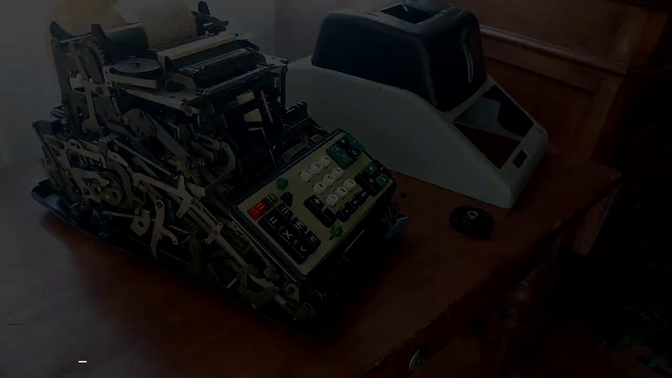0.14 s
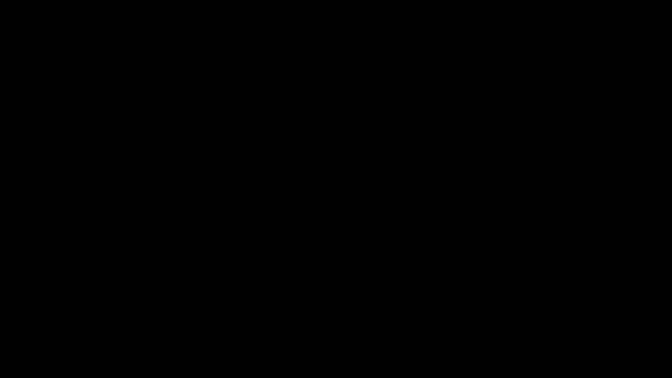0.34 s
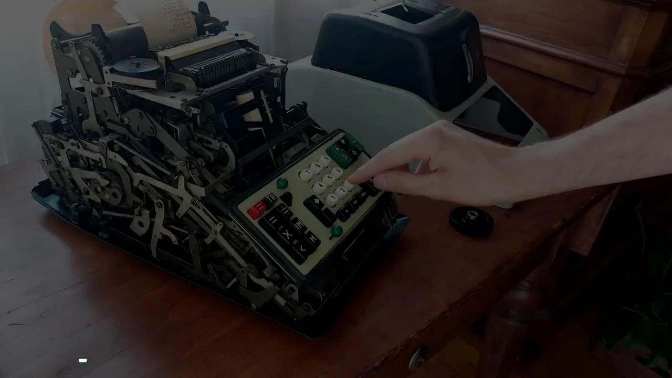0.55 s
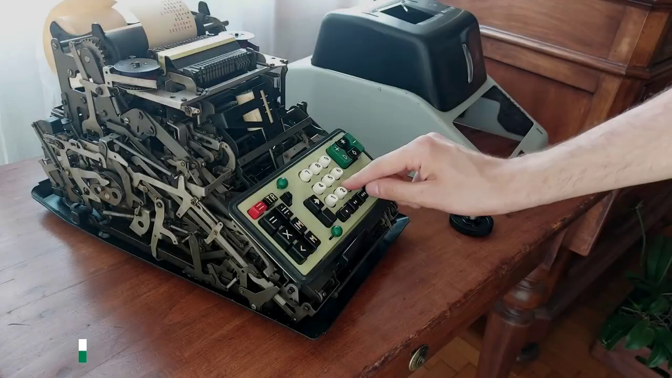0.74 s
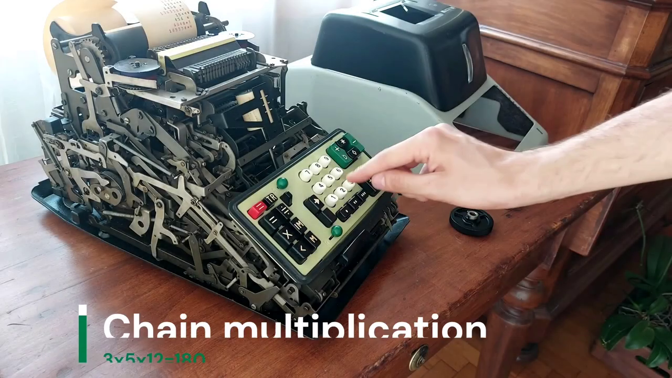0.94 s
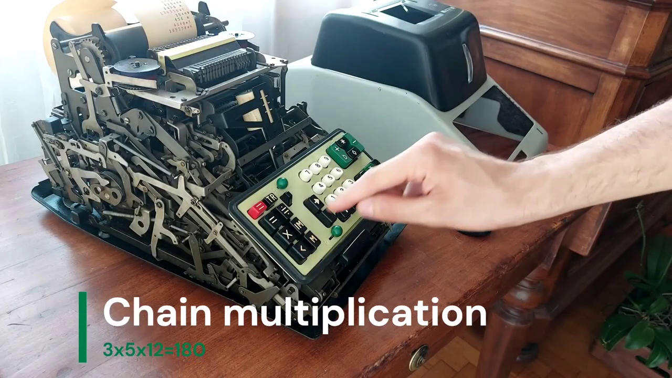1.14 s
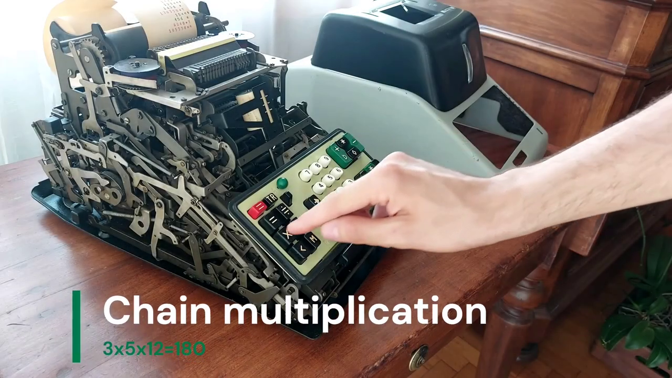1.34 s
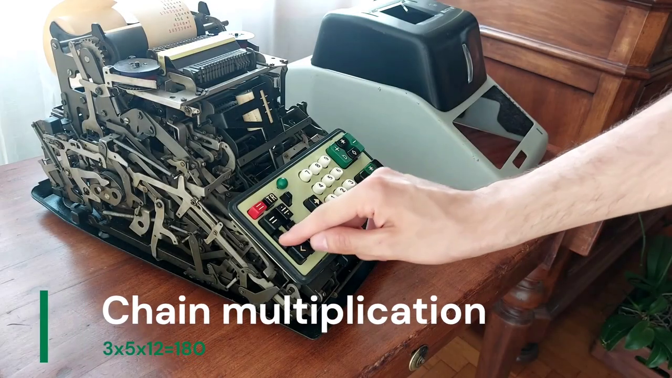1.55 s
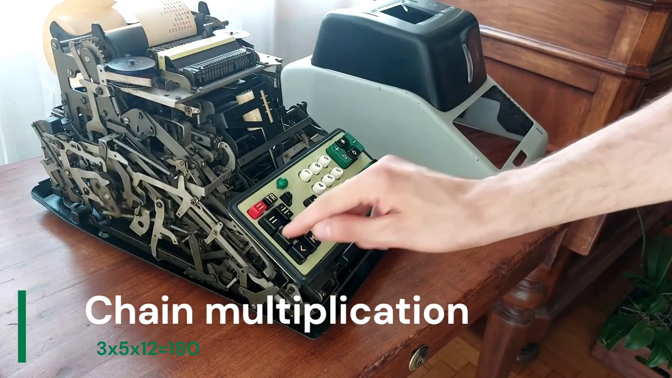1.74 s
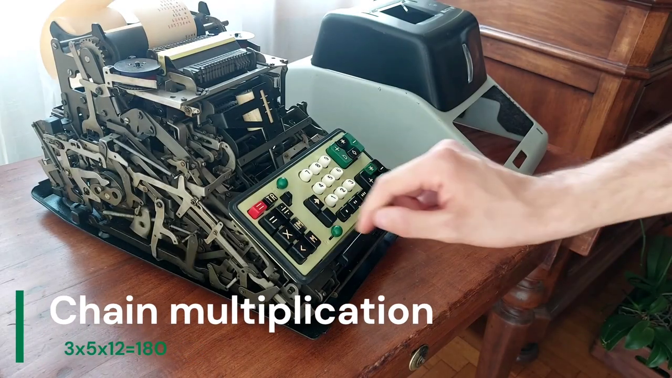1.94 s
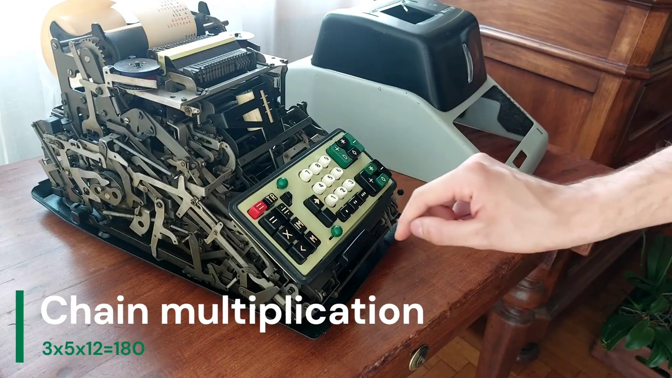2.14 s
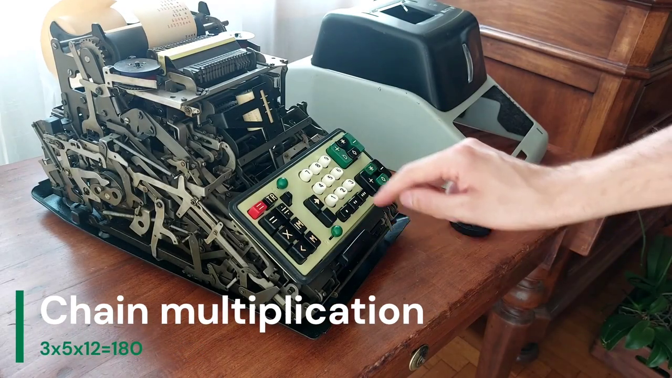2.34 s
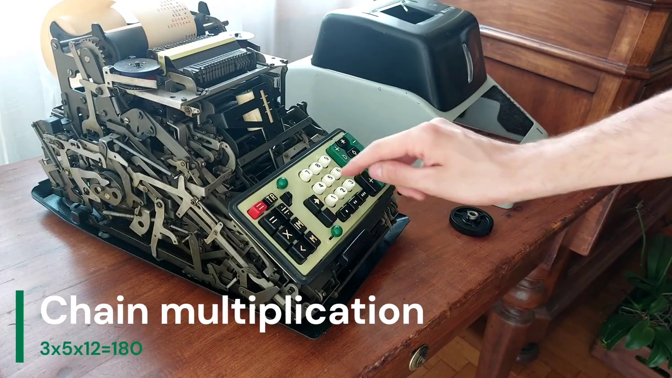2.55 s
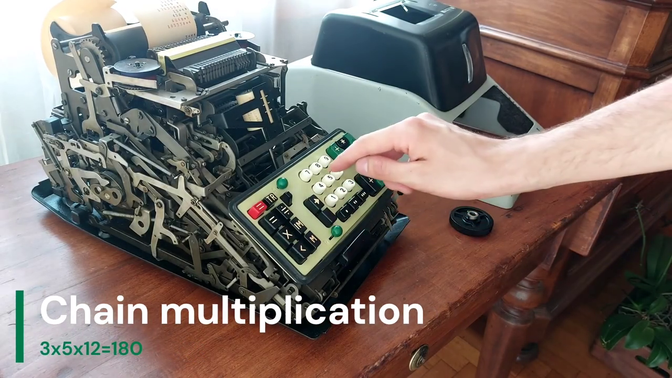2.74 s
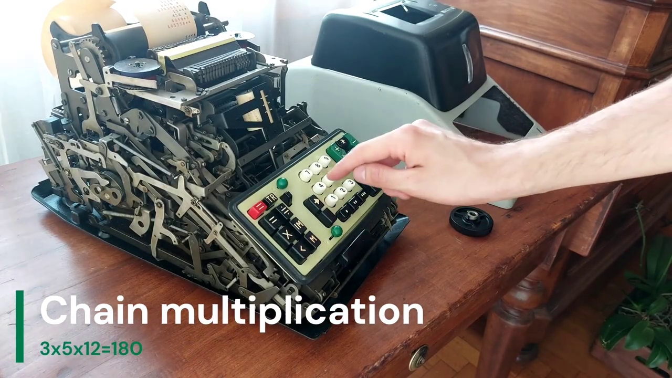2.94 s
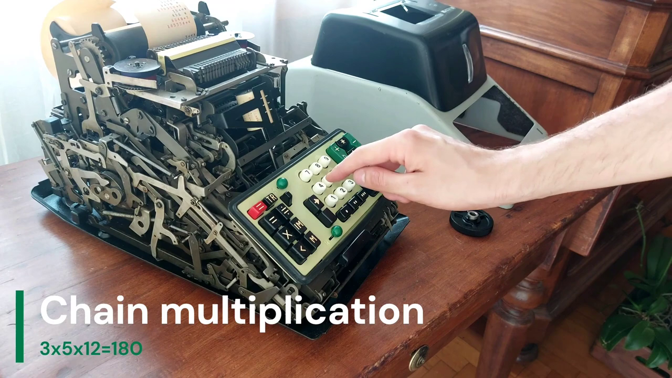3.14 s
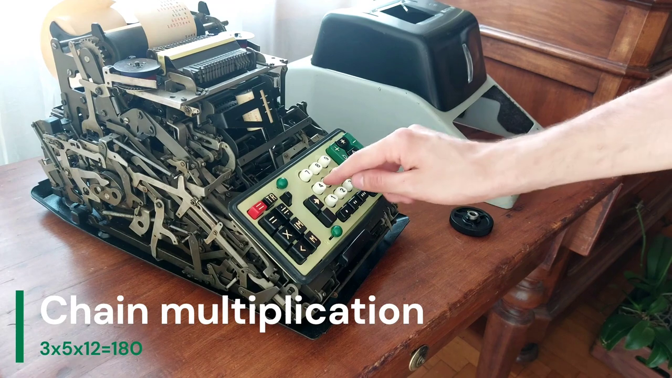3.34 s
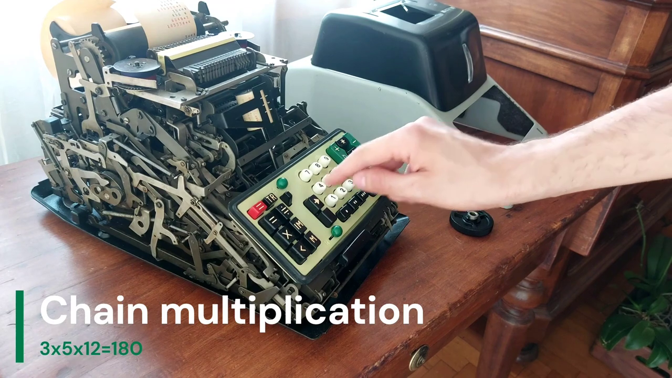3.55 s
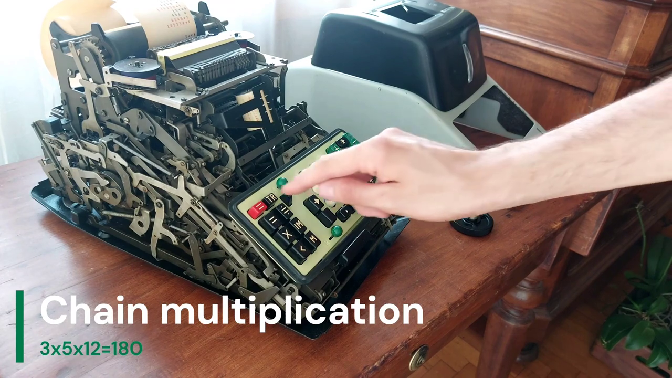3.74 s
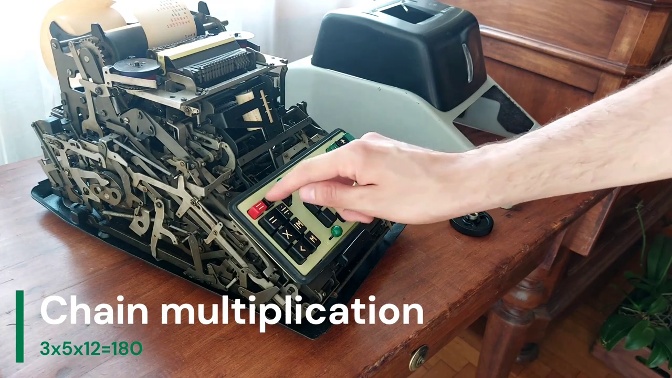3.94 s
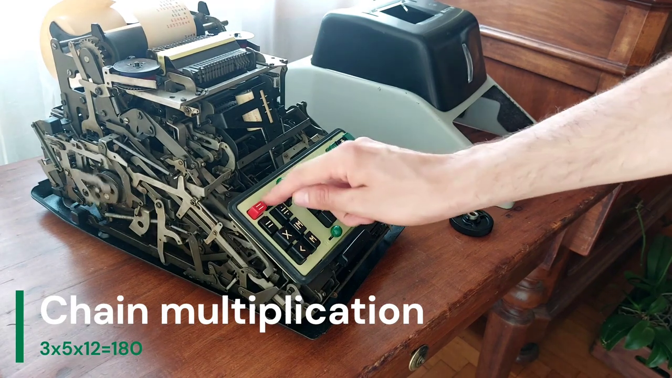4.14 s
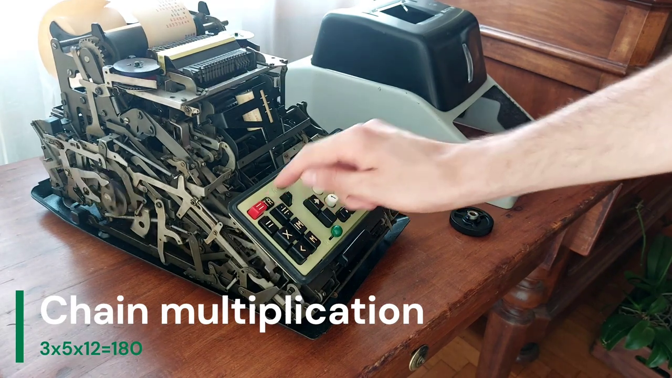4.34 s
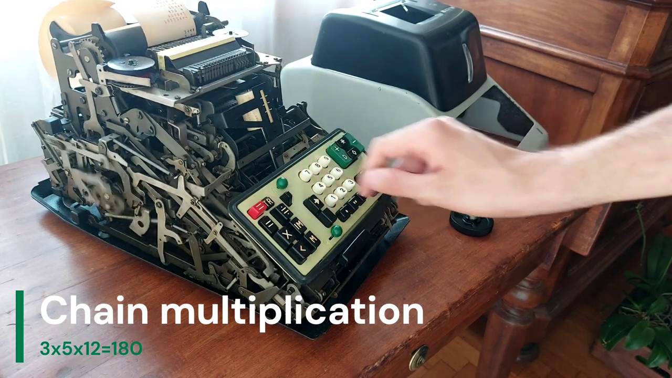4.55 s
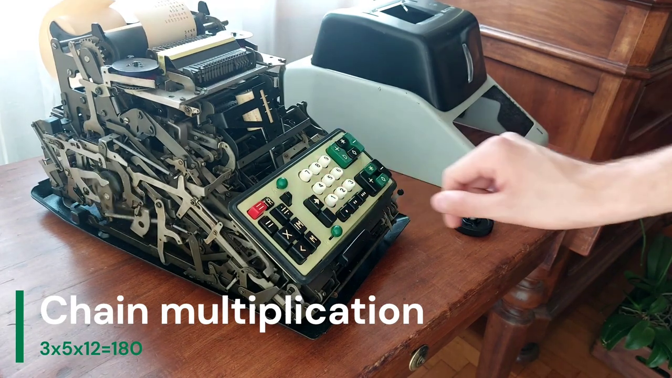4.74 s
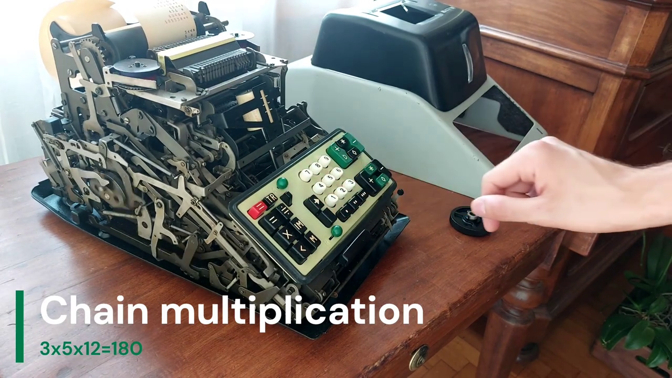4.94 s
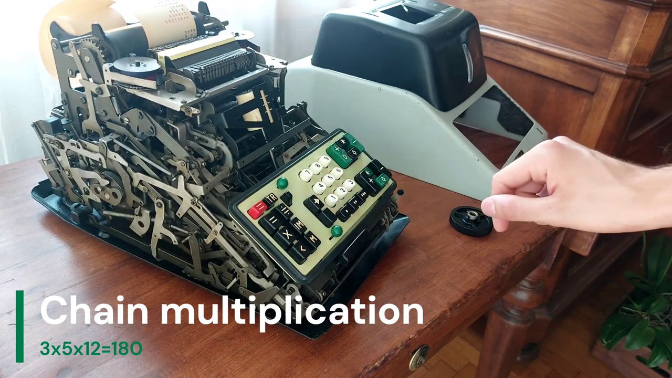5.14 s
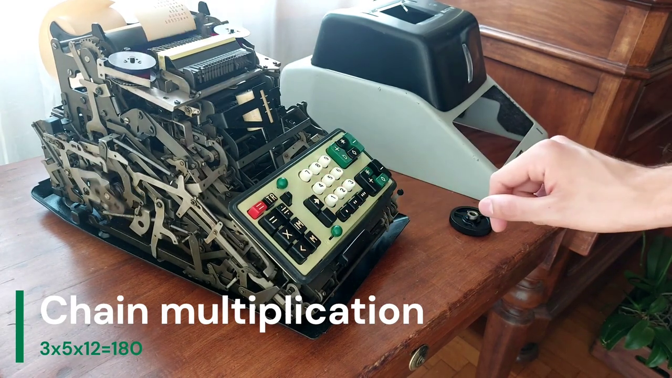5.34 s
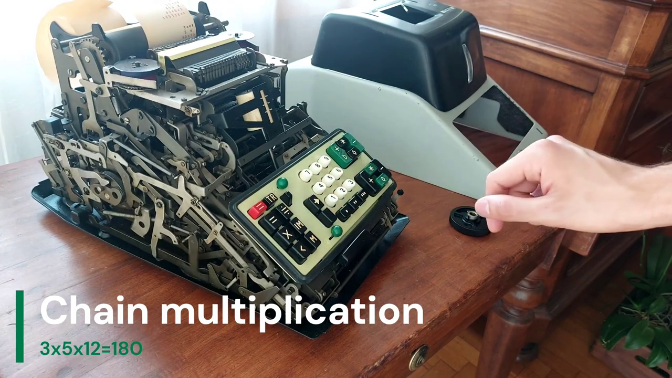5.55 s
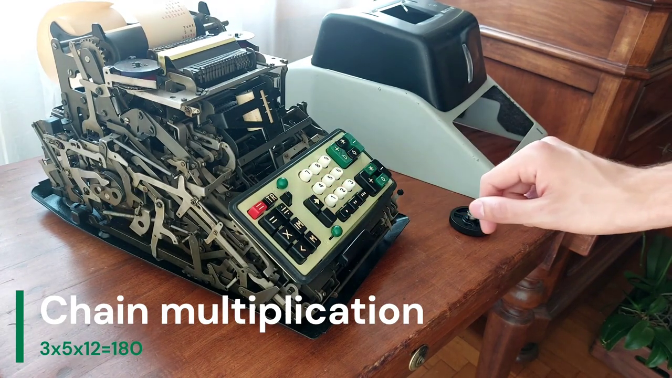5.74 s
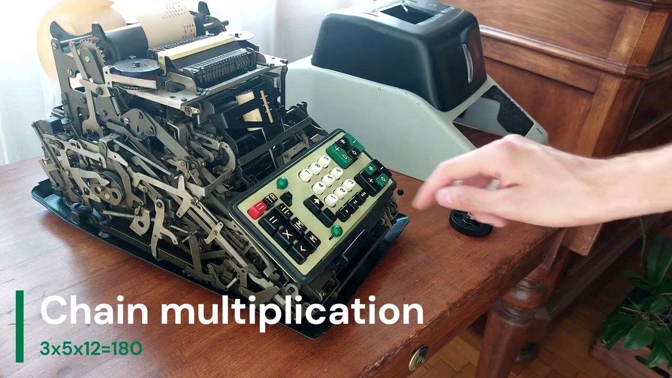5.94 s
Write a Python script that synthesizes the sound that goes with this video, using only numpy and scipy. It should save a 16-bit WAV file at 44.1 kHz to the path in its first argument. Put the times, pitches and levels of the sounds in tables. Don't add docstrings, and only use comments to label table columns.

```python
import sys
import numpy as np
from scipy import signal
from scipy.fft import rfft, irfft, next_fast_len
from scipy.io import wavfile
from scipy.ndimage import uniform_filter1d

SR = 44100
rng = np.random.default_rng(int(sys.argv[2]) if len(sys.argv) > 2 else 0)


def put_to_file(sound):
    columns = np.atleast_2d(sound).T
    safe = np.clip(columns, -1, 1)
    whole_steps = np.round(safe * 32767)
    wavfile.write(sys.argv[1], SR, whole_steps.astype(np.int16))


def convert_level_to_amplitude(level_db):
    exponent = np.asarray(level_db, float) / 20
    return 10 ** exponent


N = 263718
TIME = np.arange(N) / SR

# start_s, moving_parts_db, motor_effort_db
CYCLES = [
    [(1.61, -56, -62), (1.65, -50, -48), (1.706, -39, -35.5), (1.794, -27, -35), (1.906, -29.5, -35.5),
     (2.002, -26.5, -39.5), (2.076, -47.5, -49.5), (2.172, -49.5, -60.5), (2.2, -54, -60)],
    [(4.125, -50, -57), (4.161, -50, -42), (4.227, -38, -43), (4.301, -31.5, -34.5), (4.445, -26, -34.5),
     (4.595, -33, -37), (4.759, -29.5, -36.5), (4.893, -37.5, -40), (4.973, -20.5, -34)],
    [(4.973, -26.5, -34.5), (5.05, -28, -37), (5.163, -42, -48), (5.285, -47.5, -50.5),
     (5.365, -32.5, -37.5), (5.513, -27, -37.5), (5.611, -30, -36.5), (5.695, -49, -50.5), (5.8, -55, -56)],
]
# frequency_hz, level_db (per Hz)
STEEL = [(710, -12), (1200, -14), (1870, -7.5), (2290, -6), (3710, -2.5), (4970, -2), (8320, -3),
         (12100, -0.5), (15000, -0.5), (15700, 3)]
# frequency_hz, level_db (per Hz)
FRAME = [(240, -36.5), (400, -2.5), (439, -8), (526, -13), (772, -0.5), (896, -1.5), (1070, -1), (1870, -6),
         (2600, -1.5), (3380, -45), (5720, -120)]


def evened(x):
    return x / np.sqrt(np.mean(x ** 2) + 1e-20)


def leaned(x, lean_db):
    return x * convert_level_to_amplitude(np.array([[0.5], [-0.5]]) * lean_db)


def read(points, hz):
    f, value = np.transpose(points)
    return np.interp(np.log(hz + 1), np.log(f + 1), value)


def envelope(tables, column):
    gain = np.zeros(N)
    for rows in tables:
        rows = np.array(rows)
        level_db = np.interp(TIME, rows[:, 0], rows[:, column], -150, -150)
        gain = np.maximum(gain, convert_level_to_amplitude(level_db))
    return uniform_filter1d(gain, size=180)


def resonances(x, modes):
    out = 0
    for hz, width_hz, db in modes:
        b, a = signal.iirpeak(hz, hz / width_hz, SR)
        out = out + convert_level_to_amplitude(db) * signal.lfilter(b, a, x)
    return out


def coloured(x, points):
    size = next_fast_len(x.shape[-1])
    gain = convert_level_to_amplitude(read(points, np.fft.rfftfreq(size, 1 / SR)))
    return irfft(rfft(x, size) * gain, size)[..., :x.shape[-1]]


def stereo_noise(points, lean_db, patchy_db):
    # frequency_hz, likeness (0 to 1)
    likeness = [(60, 1), (300, 0.47), (800, 0.77), (2000, .15), (6000, 0.019)]
    frames, hz = N // 256 + 5, np.fft.rfftfreq(1024, 1 / SR)
    a, b, c, d, patches = rng.standard_normal((frames, 513, 5)).T
    patches = uniform_filter1d(patches, size=10, axis=0)
    patches = evened(uniform_filter1d(patches, size=10, axis=1))
    like = np.clip(read(likeness, hz), -1, 1)[:, None]
    left = a + 1j * b
    right = like * left + np.sqrt(1 - like ** 2) * (c + 1j * d)
    spectra = np.array([left, right]) * convert_level_to_amplitude(read(points, hz)[:, None] + patchy_db * patches)
    noise = signal.istft(spectra, nperseg=1024, noverlap=768)[1][:, :N]
    return leaned(evened(noise), lean_db)


def room_tone():
    # frequency_hz, level_db (per Hz)
    air_colour = [(18, -80), (30, -24.5), (53, -4.5), (87, -14), (125, -22), (158, -19.5), (259, -21.5),
                  (298, -24), (378, -24), (417, -33.5), (1260, -37), (1370, -37), (2680, -18.5),
                  (3400, -51), (4420, -75.5), (7480, -120)]
    # pitch_hz, width_hz, level_db
    appliances = [(125.7, 7.4, -69.5), (881, 24, -81), (2470, 30, -75.5)]
    hums = 0
    for hz, width_hz, db in appliances:
        source = rng.standard_normal(N) + 2.8 * rng.standard_normal((2, N))
        hums = hums + convert_level_to_amplitude(db) * evened(resonances(source, [(hz, width_hz, 0)]))
    self_noise = convert_level_to_amplitude(-83.0) * rng.standard_normal((2, N))
    air = convert_level_to_amplitude(-61.0) * stereo_noise(air_colour, lean_db=4.5, patchy_db=2.5)
    return air + leaned(hums, lean_db=16.5) + self_noise


def room(x):
    # frequency_hz, t60_s
    decay = [(100, 1), (1000, 0.49), (4600, 0.36), (12000, 0.19)]
    out, size = np.zeros((2, N)), SR // 2
    slots = np.arange(220, size - 20, 20)
    for k in range(3):
        taps = np.zeros((2, size))
        at = slots + rng.integers(0, 20, (2, len(slots)))
        np.put_along_axis(taps, at, rng.choice([-1., 1.], at.shape), 1)
        hz, t, z = signal.stft(taps, SR, nperseg=128)
        fading = convert_level_to_amplitude(-60 * t / read(decay, hz)[:, None])
        tail = signal.istft(z * fading, SR, nperseg=128)[1]
        turn = np.sqrt(2 / 3) * np.cos(2 * np.pi * (7 * TIME + k / 3))
        out += signal.fftconvolve(x * turn, tail / np.linalg.norm(tail[0]), axes=1)[:, :N]
    return out


def coasting():
    # after_release_s, brush_hiss_db
    rundown = [(0, -52), (0.2, -49.5), (0.5, -53), (0.95, -56.5), (1.4, -54.5), (1.6, -57.5), (1.88, -63),
               (2.03, -71)]
    # load_drops_s, next_engagement_s
    releases = [
        (2.1, 4.13),
        (5.2, 7.8),
        (5.701, 6.5),
    ]
    after, db = np.transpose(rundown)
    spans = []
    for start, end in releases:
        span = [(start, db[0])]
        span += [(start + t, d) for t, d in rundown[1:] if start + t < end]
        span.append((end, np.interp(end - start, after, db)))
        spans.append(span)
    return envelope(spans, column=1)


def brushes(rotor):
    # frequency_hz, level_db (per Hz)
    brush_colour = [(740, -29), (1250, -5.5), (1850, -5.5), (2310, 1), (2600, -5.5), (4310, -6.5),
                    (6870, -5.5), (8320, -9), (11800, -7), (15700, -14.5)]
    return convert_level_to_amplitude(1.0) * stereo_noise(brush_colour, lean_db=4.0, patchy_db=0.8) * rotor


def gear_train(rotor, flutter):
    # pitch_hz, width_hz, level_db
    gear_modes = [(758, 105, 6.5), (954, 84, 10), (1060, 40, 11.5), (2170, 54, -7.5)]
    # peak_s, pitch_hz, level_db
    gear_rubs = [
        (2.28, 790, -60),
        (2.66, 794, -59),
        (3.17, 790, -59),
        (5.251, 1040, -49),
        (5.95, 2130, -48),
    ]
    teeth = rng.standard_normal((3, N))
    teeth = 1.33 * teeth[0] + teeth[1:]
    whirr_gain = convert_level_to_amplitude(2) * abs(rotor) ** 1.106
    whirr = evened(resonances(teeth, gear_modes)) * flutter * whirr_gain
    rubs = 0
    for s, hz, db in gear_rubs:
        swell = convert_level_to_amplitude(db) * np.exp(-((TIME - s) / 0.038) ** 2)
        rubs = rubs + swell * evened(resonances(teeth, [(hz, 220, 0)]))
    return leaned(convert_level_to_amplitude(-3.0) * whirr + rubs, lean_db=1.5)


def rotor_unbalance(flutter):
    # start_s, level_db
    loaded = [
        [(4.2, -47), (4.262, -78), (4.42, -47.5), (5.006, -43.5), (5.122, -62), (5.344, -61), (5.636, -61),
         (5.7, -68)],
    ]
    hum = convert_level_to_amplitude(6.5) * np.sin(2 * np.pi * 68 * TIME) * flutter * envelope(loaded, column=1)
    return leaned(hum, lean_db=0.5)


def motor():
    flutter = convert_level_to_amplitude(1.3 * evened(uniform_filter1d(rng.standard_normal(N), size=1500)))
    rotor = coasting()
    return brushes(rotor) + gear_train(rotor, flutter) + rotor_unbalance(flutter)


def desk_top(effort):
    # pitch_hz, width_hz, level_db
    desk_modes = [(68, 16.4, -2.5), (102.5, 18.5, -0.5), (123.5, 2.2, -6.5), (178, 42, -13.5),
                  (227.4, 25.7, -5.5), (282.7, 6.7, 0), (356.8, 6.8, -6), (422, 4.4, -4.5)]
    # start_s, level_db
    thuds = [
        (0.786, -59.5),
        (0.997, -47),
        (1.03, -76),
        (1.96, -33),
        (3.514, -50.5),
        (3.88, -58.5),
        (5.03, -33.5),
        (5.127, -41.5),
        (5.46, -55),
    ]
    shake = convert_level_to_amplitude(-3.5) * abs(effort)
    for s, db in thuds:
        shake = shake + convert_level_to_amplitude(db) * (TIME > s) * np.exp(-abs(TIME - s) / 0.053)
    unsteady = convert_level_to_amplitude(1.84 * evened(uniform_filter1d(rng.standard_normal(N), size=900)))
    jolts = rng.standard_normal((3, N)) * unsteady
    wood = evened(resonances(jolts[0] + 0.36 * jolts[1:], desk_modes))
    wood = wood * uniform_filter1d(shake, size=300)
    return signal.sosfilt(signal.butter(2, 48, "high", fs=SR, output="sos"), wood)


def frame_drone(effort):
    drone = stereo_noise(FRAME, lean_db=0.0, patchy_db=1)
    return convert_level_to_amplitude(-1.5) * drone * abs(effort) ** 1.023


def dwelling():
    # trip_s, hush_db
    dwells = [
        (1.7521, -1),
        (1.9533, -4),
        (4.6432, 2),
        (4.7447, -9),
        (4.9528, -2),
        (5.1244, -16),
        (5.563, -8),
    ]
    return convert_level_to_amplitude(sum(db * (TIME < s) * np.exp(-((TIME - s) / 0.026) ** 2) for s, db in dwells))


def rattle():
    # start_s, level_db
    stems = [
        [(0.688, -77), (0.778, -81)],
        [(1.488, -74), (1.615, -51.5)],
        [(4.112, -48), (4.143, -48)],
    ]
    ticks_per_s, spread_db, parts = 600, 4, 16
    size = convert_level_to_amplitude(spread_db * np.minimum(rng.exponential(1, N), 3))
    size = size * (rng.random(N) < ticks_per_s / SR)
    part, t, out = rng.integers(0, parts, N), np.arange(600) / SR, np.zeros((2, N))
    for k in range(parts):
        common, own = rng.standard_normal(600), rng.standard_normal((2, 600))
        tick = (0.5 * common + own) * np.exp(-t / rng.uniform(0.0009, 0.0035))
        ping = np.sin(2 * np.pi * (rng.uniform(2900, 14500) * t + rng.random((2, 1))))
        tick += 0.4 * ping * np.exp(-t / 0.003)
        out += signal.oaconvolve((size * (part == k))[None], tick, axes=1)[:, :N]
    ticking = leaned(evened(coloured(out, STEEL)), lean_db=5.8)
    return ticking * envelope(CYCLES + stems, column=1) * dwelling() * convert_level_to_amplitude(2.0)


def voiced(rows, knock_db, knock_follows, knock_spread_db, pan_db, pan_spread_db):
    chance = rng.standard_normal((len(rows), 2))
    hits = []
    for (s, db, hz, treble_db), (a, b) in zip(rows, chance):
        knock = knock_db - (1 - knock_follows) * (db + 19.5) + knock_spread_db * a
        hits.append((s, db, hz, treble_db, knock, pan_db + pan_spread_db * b))
    return hits


def strikes(rows, skid_s, crack_s, ring_s, ring_db, mode_db, shared, usual_treble_db, knock_gain_db):
    size, lead_in = 2048, 256
    t, hz = (np.arange(size) - lead_in) / SR, np.fft.rfftfreq(size, 1 / SR)
    out = np.zeros((2, N + size))
    after = np.maximum(t, 0)
    rise = 1 - np.exp(-after / 0.0004) + 0.22 * np.exp(-abs(t) / skid_s)
    shape = rise * (np.exp(-after / crack_s) + convert_level_to_amplitude(ring_db) * np.exp(-after / ring_s))
    mode_shape = convert_level_to_amplitude(mode_db) * rise * np.exp(-after / 0.0025)
    knock_shape = np.exp(-after / 0.0043) * (1 - np.exp(-after / 0.0014))
    treble_tilt = 0.66 * np.tanh(np.log2((hz + 1) / 7000) * 2)
    for s, db, ring_hz, treble_db, knock_db, pan_db in rows:
        common, own = rng.standard_normal(size), rng.standard_normal((2, size))
        phase = rng.random((2, 1))
        colour_db = read(STEEL, hz) + (treble_db - usual_treble_db) * treble_tilt
        metal = evened(irfft(rfft(shared * common + (1 - shared) * own) * convert_level_to_amplitude(colour_db)))
        mode = mode_shape * np.sin(2 * np.pi * (ring_hz * t + phase))
        knock = convert_level_to_amplitude(knock_db + knock_gain_db) * evened(coloured(common, FRAME)) * knock_shape
        at = round(s * SR) - lead_in
        out[:, at:at + size] += convert_level_to_amplitude(db + 1.0) * (leaned(metal * shape + mode, pan_db) + knock)
    return out[:, :N]


def key_clicks():
    # start_s, peak_db, ring_hz (strongest), treble_db
    keys = [(0.3321, -63, 2590, -18), (0.688, -53, 2640, -12), (0.727, -43, 2720, -9),
            (0.7788, -28.5, 5300, -9.5), (0.9562, -46, 2560, -9), (0.9806, -23, 4960, -8.5),
            (0.9875, -17, 4900, -6.5), (1.488, -45.5, 2600, -7), (1.5336, -47.5, 2740, -8),
            (1.5792, -44, 13600, -7), (3.2947, -35.5, 7800, -12), (3.2985, -31.5, 11400, -11),
            (3.5011, -27.5, 8750, -11.5), (3.5058, -17, 4700, -7), (3.989, -39.5, 12300, -10),
            (4.1121, -37.5, 5890, -9)]
    hits = voiced(keys, knock_db=-33.5, knock_follows=0.36, knock_spread_db=-3.5, pan_db=5.5, pan_spread_db=3.5)
    return strikes(hits, skid_s=0.0014, crack_s=0.0012, ring_s=0.0069, ring_db=-11, mode_db=-22,
                   shared=0.075, usual_treble_db=-7.0, knock_gain_db=3.5)


def blow_times():
    # start_s, peak_db, ring_hz (strongest)
    entry = [(1.6212, -17, 12500), (1.6968, -29.5, 2500), (1.7051, -25.5, 2420), (1.7354, -22, 11900),
             (1.7521, -19, 12000), (1.7609, -15.5, 12300), (1.7792, -19, 12500), (1.7889, -30, 12900),
             (1.7957, -20.5, 12400), (1.8129, -19, 12400), (1.8229, -19.5, 4470), (1.8333, -15, 3270),
             (1.8523, -23, 12000), (1.8693, -19, 12100), (1.8954, -18, 11900), (1.9332, -36, 12900),
             (2.0003, -26, 5830), (2.0066, -24, 11700), (2.0196, -36, 11600)]
    # start_s, peak_db, ring_hz
    product = [(4.1222, -42, 5330), (4.138, -34, 5000), (4.1437, -19.5, 13300), (4.152, -28.5, 3060),
               (4.16, -12, 13200), (4.2392, -28, 11600), (4.2471, -21, 11500), (4.2686, -22.5, 3740),
               (4.3174, -31, 11900), (4.9526, -10, 14100), (4.963, -15, 13600), (5.0106, -20.5, 5870),
               (5.0284, -12, 12100), (5.077, -26, 13100), (5.1243, -12.5, 3150), (5.1413, -21, 6150),
               (5.3053, -36, 11840), (5.3334, -20.5, 11700), (5.348, -21, 11840), (5.368, -25, 12100),
               (5.4285, -23, 3300), (5.4421, -18, 4420), (5.4598, -15.5, 12200), (5.4736, -21, 10500),
               (5.5963, -16.5, 13400), (5.6052, -18, 12000), (5.6207, -28, 4470)]
    # into_turn_s, peak_db, ring_hz
    adding_turn = [(0, -25, 5720), (0.018, -16.5, 11700), (0.0345, -19, 5800), (0.058, -22, 7600),
                   (0.0648, -15, 13500), (0.0825, -24, 12400), (0.0975, -17, 13000), (0.1182, -16.5, 4420),
                   (0.1325, -20, 12100), (0.1388, -14, 12200), (0.1572, -19, 5000), (0.1718, -17, 11700),
                   (0.192, -19.5, 6940), (0.22, -29, 11500), (0.238, -27, 12900), (0.2515, -29, 4900)]
    # start_s, slowing (factor), length_s
    turns = [
        (4.3603, 0.97, 0.26),
        (4.624, 1.06, 0.26),
        (4.8915, 1.0, 0.045),
    ]
    # after_stop_s, peak_db, ring_hz
    stop_blows = [
        (0, -13.5, 13400),
        (0.0196, -13.5, 12630),
        (0.101, -30.5, 4300),
    ]
    # start_s, strength_db
    stops = [
        (1.9527, -0.5),
        (5.5621, -2),
    ]
    rows = entry + product
    rows += [(s + t, db + strength, hz) for s, strength in stops for t, db, hz in stop_blows]
    for s, slowing, length_s in turns:
        rows += [(s + t * slowing, db, hz) for t, db, hz in adding_turn if t < length_s]
    return rows


def machine_blows():
    rows = []
    for s, db, hz in blow_times():
        treble_db = -3 if hz > 9000 else -7.5
        rows.append((s, db, hz, treble_db + 1.3 * rng.standard_normal()))
    hits = voiced(rows, knock_db=-16.5, knock_follows=0.67, knock_spread_db=5.5, pan_db=5.8, pan_spread_db=1.3)
    return strikes(hits, skid_s=0.002, crack_s=0.0022, ring_s=0.016, ring_db=-9.5, mode_db=-11,
                   shared=0.29, usual_treble_db=-4.5, knock_gain_db=-2.0)


def scene():
    keys = key_clicks()
    clatter = machine_blows() + rattle()
    effort = envelope(CYCLES, column=2)
    near = keys + clatter + desk_top(effort) + frame_drone(effort) + motor()
    near[1] = np.roll(near[1], 8)
    echo = room(convert_level_to_amplitude(-2.0) * keys + convert_level_to_amplitude(-4) * clatter)
    return near + echo + room_tone()


def top_cut(x):
    return signal.sosfilt(signal.butter(12, 17110, fs=SR, output="sos"), x)


def record(dry):
    low_pass = signal.firwin(511, 15800, window=("kaiser", 6), fs=SR)
    limited = signal.oaconvolve(dry, low_pass[None], "same")
    limited = signal.sosfilt(signal.butter(2, 34, "high", fs=SR, output="sos"), limited)
    return top_cut(limited)


dry = scene()
out = record(dry)
put_to_file(out)
```